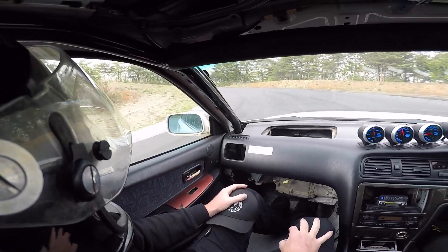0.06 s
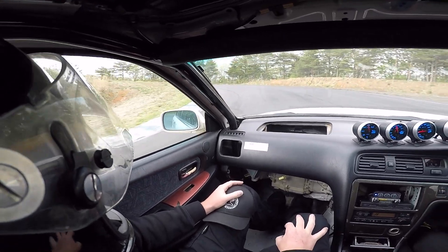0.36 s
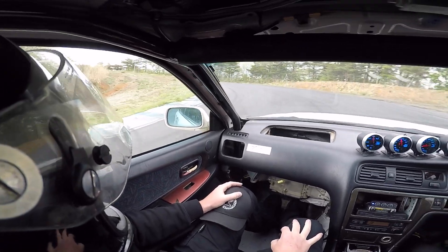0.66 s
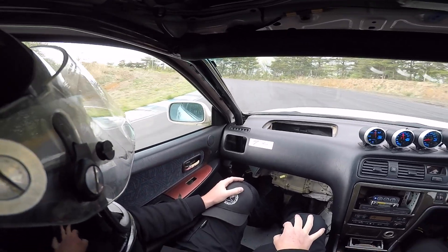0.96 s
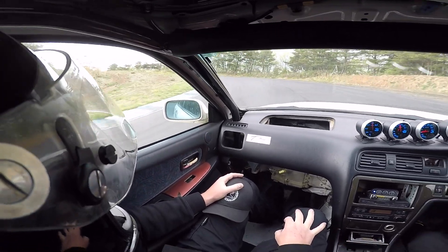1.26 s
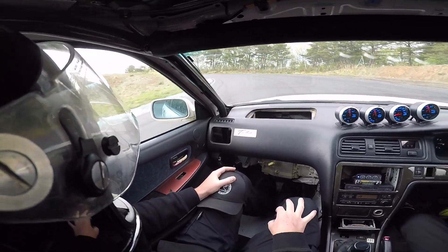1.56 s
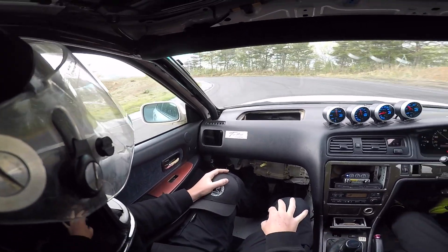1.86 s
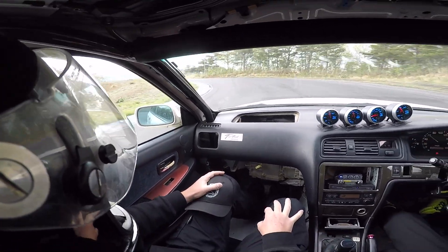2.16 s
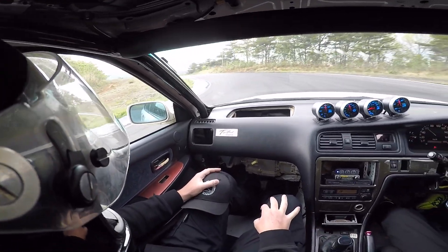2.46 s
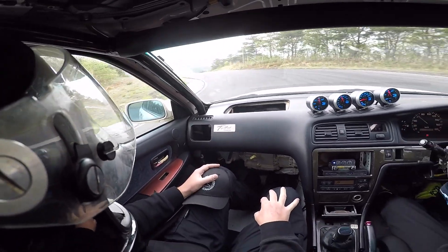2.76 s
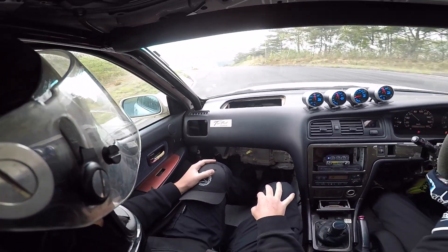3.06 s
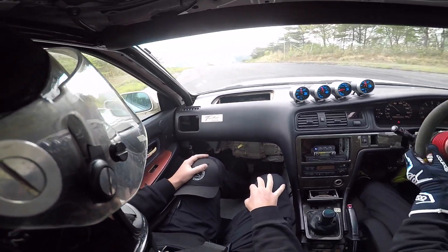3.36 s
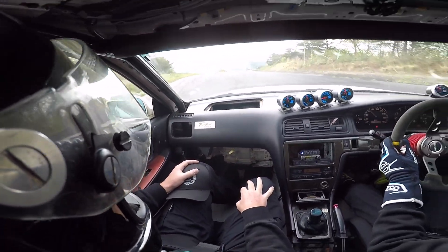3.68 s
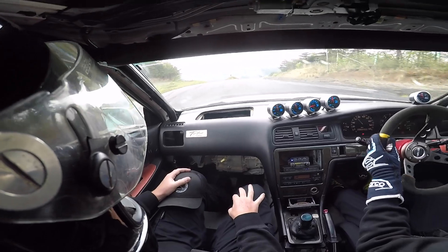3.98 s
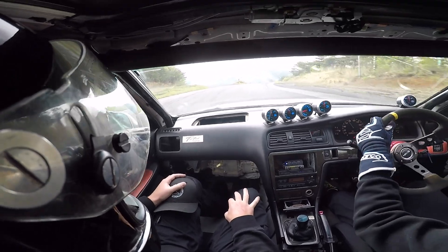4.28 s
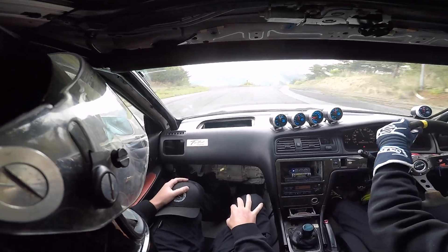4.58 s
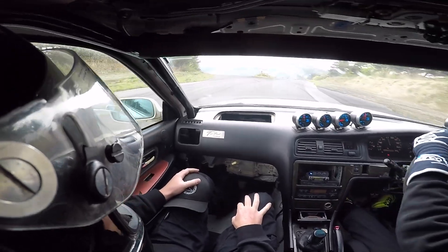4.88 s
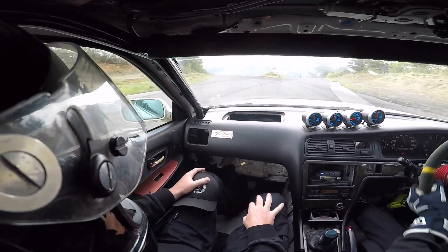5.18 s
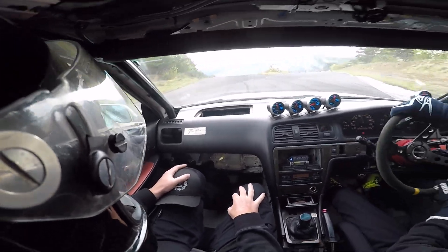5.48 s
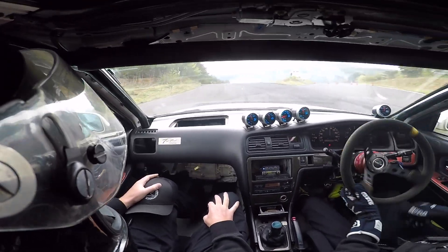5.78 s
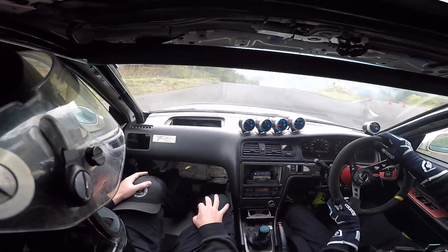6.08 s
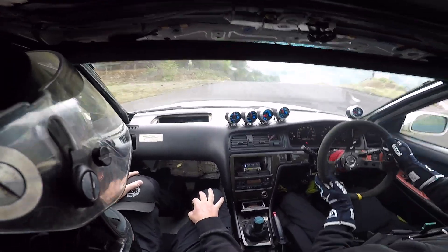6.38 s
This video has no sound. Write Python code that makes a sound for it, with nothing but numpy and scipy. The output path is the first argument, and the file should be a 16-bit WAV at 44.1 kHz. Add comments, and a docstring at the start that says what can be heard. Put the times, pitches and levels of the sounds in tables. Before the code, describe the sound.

A loud car engine drones and gradually accelerates, its tones swelling and fading in a bare cabin. Loose bits rattle briefly and the road rumbles underneath. Towards the end the revs shoot up with a rush of air as the wheels spin and the tyres squeal hoarsely on the track, then the revs fall back. The microphone sits between the seats.

```python
"""First comes the boom of a straight-six engine, heard inside a drifting car. The revs climb, shoot up as
the wheels spin, then drop as the driver briefly lifts off. The engine's tones swell and fade as they pass
the notes at which the bare cabin rings. Air rushes into the intake, and the sliding tyres scrub and,
near the end, squeal. Underneath, the body rumbles, the road roars, loose bits rattle and faint whines
come and go. A small on-board camera holds the peaks down."""
import sys
import numpy as np
from scipy import signal
from scipy.fft import rfft, irfft, next_fast_len
from scipy.io import wavfile
from scipy.ndimage import uniform_filter1d, minimum_filter1d

SR = 44100
rng = np.random.default_rng(int(sys.argv[2]) if len(sys.argv) > 2 else 0)


def wav_record(signal):
    """Record a signal, one row per channel, as 16-bit PCM in the file named by sys.argv[1]."""
    frames = np.transpose(np.atleast_2d(signal))
    bounded = np.clip(frames, -1, 1)
    # unit amplitude maps onto the largest positive 16-bit level
    quanta = np.round(bounded * 32767).astype(np.int16)
    wavfile.write(sys.argv[1], SR, quanta)


N = 283563
TIME = np.arange(N) / SR

# how often the cylinders fire: t/s, f/Hz
FIRING_RATE = [(0, 148.2), (0.54, 152.5), (0.65, 158), (0.78, 156.5), (1.3, 166.8), (1.56, 170.5),
               (2.3, 174.5), (2.38, 178), (2.55, 177.2), (3.17, 182.5), (3.67, 193.3), (3.78, 198.4),
               (3.9, 200.8), (4.07, 212), (4.34, 221.6), (4.48, 220.5), (4.99, 242.5), (5.1, 243.3),
               (5.43, 269.4), (5.8, 319.6), (6, 353.7), (6.12, 365.1), (6.29, 298), (6.43, 299.3)]
# An "order" is a tone at a whole multiple of the engine's cycle rate; order 6 is the firing rate.
STRONG_ORDERS = (3, 6, 9, 12, 18, 20, 22, 24, 28, 36, 42)
REV_STAGES_HZ = (173, 179, 240, 300)  # firing rates: off boost, just on boost, pulling hard, wheelspin
# strength of the strong orders, one row each: level/dB at each of the four rev stages
ORDER_LEVELS = [(-26.6, -17, -21, -12), (-4.5, -3.5, -1.6, -21), (-26.5, -7, -33.5, -18.5),
                (-22, -27, -0.9, -20.5), (-15.5, -14.5, -22, -13), (-30.5, -35.5, -39.5, -25),
                (-32, -35.5, -32, -30.5), (-27.5, -25, -16.5, -13), (-38, -42, -38, -29),
                (-31.5, -16, -22, -25), (-34, -31, -30, -26.3)]
# how well each pitch of the exhaust reaches the seats: f/Hz, level/dB
EXHAUST_COLOUR = [(90, -18), (125, -6), (150, -3.5), (175, -7), (235, -13), (252, -11), (290, -8.5),
                  (325, 2.5), (370, -2.5), (400, -0.3), (440, -10.5), (485, -15), (525, -10.5), (575, 2.8),
                  (620, 1.9), (695, 6.5), (780, -4), (870, -22), (1130, -20), (1210, -30), (1290, -22),
                  (1440, -19.5), (1580, -31), (1690, -23), (1900, -34)]
# pitches at which the cabin's echoes cancel at the seats: f/Hz, half-width/Hz
DEAD_NOTES = [(190.9, 6.9), (199.0, 0.55), (213.8, 3.4), (234.3, 2.7), (263.7, 0.47), (303.6, 3.4),
              (312.9, 2.7), (334.0, 1.6), (353.6, 0.75), (407.9, 3.5), (433.3, 9), (469.0, 7.3),
              (501.2, 6.2), (520.1, 5.2), (592.5, 8.1), (659.7, 19), (714.9, 9.1), (747.1, 18)]
# notes at which the cabin's air and panels ring: f/Hz, width/Hz, level/dB
CABIN_NOTES = [(146.6, 8.4, 9.5), (269, 20.2, 3), (430, 41, -3), (489, 21, -0.5), (559.7, 24.8, 3.5),
               (610, 7.7, 2.5), (689.3, 8.8, 4.5), (764, 8.1, -20), (900, 13, -25), (1043, 58, -11.5),
               (1110, 73, -16.5), (1444, 37, -18.5), (1670, 11, -8.5)]
# panels briefly singing along with the engine: t/s, half-length/s, f/Hz, level/dB
PANEL_FLARES = [(.74, 0.12, 627, -30.5), (1.05, 0.19, 488, -32.5), (1.1, .12, 325, -26),
                (2.1, .22, 695, -33.5), (3.297, 0.083, 1110, -38), (3.801, .05, 1200, -35),
                (4.123, 0.076, 1490, -36), (4.72, 0.049, 1390, -39), (4.95, .09, 1450, -37.5),
                (4.961, 0.033, 1690, -36), (5.22, 0.077, 252, -13), (5.38, 0.075, 398, -20.5),
                (5.56, .06, 1140, -30), (5.855, 0.041, 326, -19), (6.261, 0.041, 312, -17.5),
                (6.342, .04, 600, -25)]
# strength of the intake's hiss, which stands for how far the throttle is open: t/s, level/dB
THROTTLE = [(0, -52), (.7, -46), (3.3, -43), (3.9, -40.5), (4.28, -33.5), (4.55, -40.5), (4.9, -37.5),
            (5.27, -37.5), (5.33, -32.5), (6.15, -31), (6.22, -40), (6.34, -47), (6.43, -32)]
# tone colour of the engine-bay rasp: f/Hz, level/dB
RASP_COLOUR = [(1200, -9.5), (1900, -0.5), (2500, -1), (3200, -1.5), (4500, -6), (6000, -7), (7100, -18.5),
               (9200, -23), (11300, -33.5), (13000, -40), (15000, -41)]
# tone colour of the air rushing into the intake: f/Hz, level/dB
RUSH_COLOUR = [(1180, -37), (2000, -11.5), (2330, -25.5), (2690, -10.5), (3130, -2), (5140, 0.5),
               (6240, -2), (7330, -13), (8670, -10), (9430, -15.5), (11100, -28.5), (12700, -15.5),
               (15000, -24)]
# tyre squeal as the car swings, pitched at the rate the tread sticks and slips: t/s, f/Hz, level/dB
SQUEAL = [(5.3, 1049, -67), (5.7, 1024, -27), (5.85, 987.5, -27), (6.0, 1038, -29), (6.12, 1001, -28),
          (6.3, 976, -31.5), (6.43, 950, -49)]
# tone colour of the scrubbing tread: f/Hz, level/dB
SCRUB_COLOUR = [(500, -11), (850, -0.5), (1050, -3.5), (1400, -2), (1850, -3.5), (2400, -15), (4000, -47)]
# the body shaking over the track: t/s, level/dB
RUMBLE_LEVEL = [(0, -25), (.7, -21.5), (2.6, -19), (3.4, -17), (3.95, -17), (4.6, -15), (5.2, -23.5),
                (5.4, -15), (6.05, -14.5), (6.28, -27), (6.43, -19)]
# tone colour of that shaking: f/Hz, level/dB
RUMBLE_COLOUR = [(12, -7.5), (24, -0.5), (32, 14), (45, 2.5), (60, -1.5), (90, -20), (200, -59.5)]
# the road's roar: t/s, level/dB
ROAD_LEVEL = [(0, -24.5), (1.2, -25.5), (2.4, -22), (3.4, -19.5), (4.2, -18), (5, -16.5), (5.7, -15.5),
              (6.43, -15)]
# tone colour of the roar through the floor: f/Hz, level/dB
ROAD_COLOUR = [(40, -17), (70, 2), (100, 0), (160, 3), (300, -3), (420, -10), (600, -8), (740, -9),
               (880, -24.5), (2000, -52)]
# tone colour of the road noise that sets the cabin ringing: f/Hz, level/dB
RING_COLOUR = [(60, -5.5), (200, 0.5), (700, -8.0), (950, -6.5), (1700, -5.5), (3000, -27.5)]
# loose bits rattling: t/s, level/dB, f/Hz, decay/s
RATTLES = [(1.64, -33, 2200, 0.025), (1.947, -30, 3700, 0.01), (2.53, -40, 3600, 0.034),
           (2.68, -29.5, 3320, 0.028), (3.13, -26, 2686, 0.019), (3.775, -33, 4500, .025)]
# tone colour of a hard crack of grit: f/Hz, level/dB
GRIT_COLOUR = [(800, -12), (1800, 10), (6000, -8), (9000, -11), (15000, -29)]
# faint whines early in the climb: t/s, half-length/s, f/Hz, level/dB
WHINES = [(.15, .2, 1460, -46), (.8, 0.27, 1690, -45.5), (1.35, .12, 1470, -44), (1.85, .13, 1680, -44.5)]


def engine_boom(cycle, firing_hz, rough, flutter=0.56, waver_db=0.77, step=64):
    """The exhaust's strong tones swell and fade as the revs sweep them through the cabin's notes."""
    out, revs = 0, firing_hz[::step]
    lift = undb(-7.5 * swell(6.2, half_s=0.058))  # the exhaust softens while the driver lifts off
    for order, stages_db in zip(STRONG_ORDERS, ORDER_LEVELS):
        gain = undb(np.interp(revs, REV_STAGES_HZ, stages_db)) * exhaust_to_seats(revs * order / 6)
        gain = lift * np.interp(TIME, TIME[::step], gain) + singing_panels(order, firing_hz)
        angle = 2 * np.pi * (order * cycle + rng.random())
        unsteady = flutter * rough * (wander(45) * np.sin(angle) + wander(45) * np.cos(angle))
        out = out + gain * undb(waver_db * wander(12)) * (np.sin(angle) + unsteady)
    return np.sqrt(2) * out


def engine_growl(cycle, rough, odd_db=-8, firing_db=4, waver_db=4.5, scatter=.16, tilt_db=-7):
    """Unequal cylinders add weaker tones between the strong ones, and these ring the cabin."""
    out = 0
    for order in range(4, 62):
        if order in STRONG_ORDERS:
            continue
        db = odd_db * (order % 2) + firing_db * (order % 6 == 0) + waver_db * wander(5)
        db = db + tilt_db * np.clip(order / 8 - 3.5, 0, 1)  # blunt exhaust puffs carry less treble
        smear = scatter * order * rough * wander(70)  # uneven firings blur the high tones most
        out = out + undb(db) * np.sin(2 * np.pi * (order * cycle + rng.random()) + smear)
    return cabin(out)


def crank_cycles(firing_hz, rough):
    """Engine cycles turned so far, six firings each; the speed trembles as the tyres grip and slip."""
    tremble = 0.01236 * wander(28) + 0.0095 * wander(140)
    return np.cumsum(firing_hz * (1 + rough * tremble)) / SR / 6


def exhaust_to_seats(hz):
    """How much of an exhaust tone reaches the seats; it drops out where the cabin's echoes cancel."""
    gain = colour_gain(hz, EXHAUST_COLOUR)
    for centre, width in DEAD_NOTES:
        gain = gain * np.tanh(np.abs(hz - centre) / width)
    return gain


def singing_panels(order, firing_hz):
    """Extra gain for one order: each panel briefly sings along with the strong tone nearest its pitch."""
    out = 0
    for s, half_s, hz, db in PANEL_FLARES:
        panel_order = 6 * hz / np.interp(s, TIME, firing_hz)
        if order == min(STRONG_ORDERS, key=lambda k: abs(k - panel_order)):
            out = out + undb(db) * swell(s, half_s)
    return out


def rasp_and_intake(cycle, throttle_db):
    """The engine bay rasps, throbbing with each firing; at wide throttle rushing air covers it."""
    throb = 1 + 0.11 * np.sin(2 * np.pi * 6 * cycle) + 0.1 * np.sin(2 * np.pi * 2 * cycle)
    rasp = noise(RASP_COLOUR) * throb * undb(-34 + 0.54 * throttle_db + .5 * wander(40))
    rush = noise(RUSH_COLOUR) * undb(-33.5 + 1.74 * throttle_db + 0.96 * wander(35))
    return echoes(rasp + rush, fade_s=0.15, echo_db=-9)


def tyre_squeal(jitter=0.014, overtone_db=-12):
    """The tread sticks and slips at an unsteady rate, in hoarse snatches."""
    hz, db = curves(SQUEAL)
    angle = 2 * np.pi * np.cumsum(hz * (1 + jitter * wander(70))) / SR
    tone = np.sin(angle) + undb(overtone_db) * np.sin(2 * angle)
    return echoes(undb(db + 2.9 * wander(30)) * tone, fade_s=0.27, echo_db=11.0)


def tyre_scrub(rev_octaves, throttle_db):
    """The tread rubs unevenly, louder as the revs rise and as a wide throttle spins the wheels."""
    rolling = undb(-41 + 6 * rev_octaves)
    spinning = undb(-30 + 1.8 * throttle_db)
    scrub = noise(SCRUB_COLOUR) * np.hypot(rolling, spinning) * undb(2.1 * wander(60))
    return echoes(scrub, fade_s=0.17, echo_db=-3.5)


def body_and_road():
    """The body shakes, and the road roars through the floor and sets the cabin ringing."""
    road_db, = curves(ROAD_LEVEL)
    rumble_db, = curves(RUMBLE_LEVEL)
    rumble = noise(RUMBLE_COLOUR) * undb(rumble_db)
    roar = noise(ROAD_COLOUR) * undb(road_db + 0.77 * wander(16))
    ring = cabin(noise(RING_COLOUR) * undb(road_db - 0.5))
    return rumble + roar + ring


def rattles(rise_s=0.0018):
    """Loose trim and grit chatter in short, dry bursts."""
    out = np.zeros(N)
    for s, db, hz, decay_s in RATTLES:
        age = np.maximum(TIME - s, 0)
        burst = noise([(hz / 5, -25), (hz / 2, -2), (hz, 0), (hz * 1.64, -8), (hz * 3, -38)])
        out += undb(db) * burst * (1 - np.exp(-age / rise_s)) * np.exp(-age / decay_s)
    return out


def grit_strike(at_s=1.947, db=-27, decay_s=.003):
    """A piece of grit hits the body with a bright crack."""
    age = TIME - at_s
    return undb(db) * noise(GRIT_COLOUR) * (age > 0) * np.exp(-np.abs(age) / decay_s)


def whines(wobble=.006):
    """Thin, wavering tones swell and fade."""
    out = 0
    for s, half_s, hz, db in WHINES:
        angle = 2 * np.pi * np.cumsum(hz * (1 + wobble * wander(60))) / SR
        out = out + undb(db) * swell(s, half_s) * np.sqrt(2) * np.sin(angle)
    return out


def cabin(x, top_hz=1900):
    """The cabin rings at its own notes; the wall in front of it blocks the treble."""
    size = next_fast_len(N + SR // 4)
    hz = np.arange(1, size // 2 + 2) * SR / size
    ringing = sum(undb(db) / (1 + 1j * (hz ** 2 - centre ** 2) / (hz * width))
                  for centre, width, db in CABIN_NOTES)
    wall = 1 / (1 + (hz / top_hz) ** 8)
    return irfft(rfft(x, size) * ringing * wall, size)[:N]


def echoes(x, fade_s, echo_db):
    """Glass and bare metal add a short blur of echoes, dying away at 60 dB per fade_s."""
    age = TIME[:SR // 6]
    tail = rng.standard_normal(len(age)) * np.exp(-np.log(1000) * age / fade_s)
    echo = signal.fftconvolve(x, tail / np.linalg.norm(tail))[:N]
    return (x + undb(echo_db) * echo) / np.hypot(1, undb(echo_db))


def undb(db):
    """Turn decibels into a gain to multiply by."""
    return 10 ** (np.asarray(db) / 20)


def curves(table):
    """Join a table's points in time with straight lines, one curve per column of values."""
    s, *columns = np.transpose(table)
    return [np.interp(TIME, s, column) for column in columns]


def swell(at_s, half_s):
    """A bell-shaped rise and fall that reaches 1 at at_s."""
    return np.exp(-((TIME - at_s) / half_s) ** 2)


def colour_gain(hz, colour):
    """Gain of a tone colour at the given frequencies; silent above its last point."""
    points_hz, db = np.transpose(colour)
    return undb(np.interp(np.log(hz + 1), np.log(points_hz), db, right=-np.inf))


def noise(colour):
    """Noise with the given tone colour, scaled to a typical size (rms) of 1."""
    size = next_fast_len(N)
    white = rfft(rng.standard_normal(size))
    hz = np.arange(len(white)) * SR / size
    x = irfft(white * colour_gain(hz, colour), size)[:N]
    return x / x.std()


def wander(steps_per_s):
    """A random drift with a typical size near 1."""
    steps = rng.standard_normal(4096)
    return 1.223 * np.interp(TIME * steps_per_s, np.arange(len(steps)), steps)


def scene():
    """Engine, air, tyres and body, as heard between the seats."""
    firing_hz, = curves(FIRING_RATE)
    throttle_db = curves(THROTTLE)[0] + 33  # 0 dB is wide open
    rev_octaves = np.log2(firing_hz / 150)  # octaves above cruising revs
    slip = np.maximum(np.log2(firing_hz / 182.3), 0)  # the wheels slip above this firing rate
    rough = 0.053 + 0.346 * slip  # slipping shakes the engine
    cycle = crank_cycles(firing_hz, rough)
    boom = engine_boom(cycle, firing_hz, rough)
    growl = undb(-34.5 + 8 * rev_octaves) * engine_growl(cycle, rough)
    air = rasp_and_intake(cycle, throttle_db)
    road = body_and_road()
    tyres = tyre_scrub(rev_octaves, throttle_db) + tyre_squeal()
    return (boom + growl + air + road + tyres + rattles() + grit_strike() + whines())[None]


def record(dry, ceiling=.95, window=200, top_hz=15250):
    """A limiter turns the sound down just ahead of loud peaks; the highest treble is cut."""
    safe_gain = np.minimum(1, ceiling / (np.abs(dry) + 1e-9))
    gain = uniform_filter1d(minimum_filter1d(safe_gain, window), window)
    treble_cut = signal.ellip(10, .2, 80, top_hz, fs=SR, output="sos")
    return signal.sosfilt(treble_cut, dry * gain)


dry = scene()
out = record(dry)
wav_record(out)
```